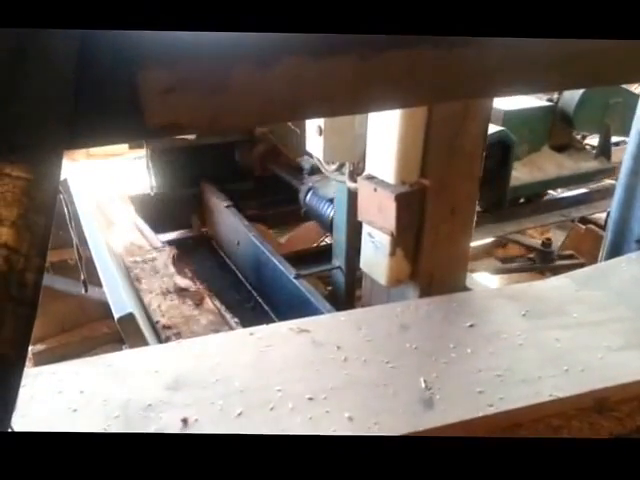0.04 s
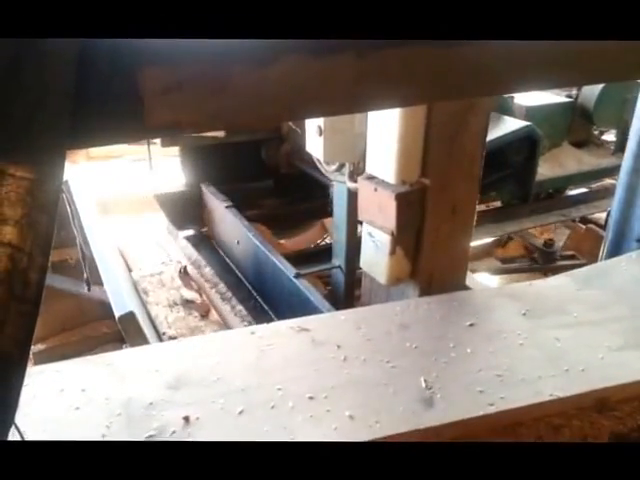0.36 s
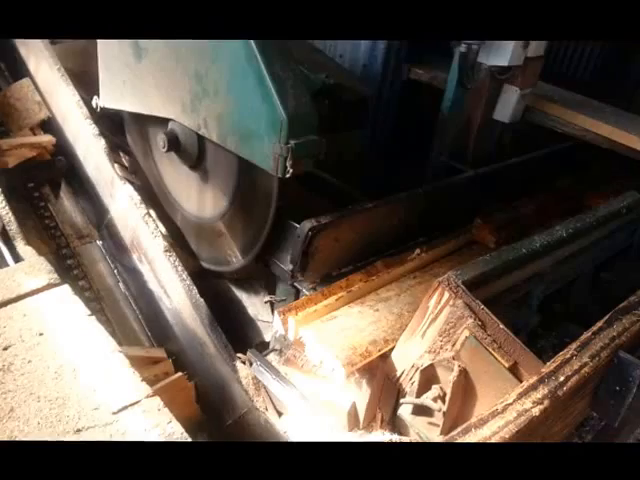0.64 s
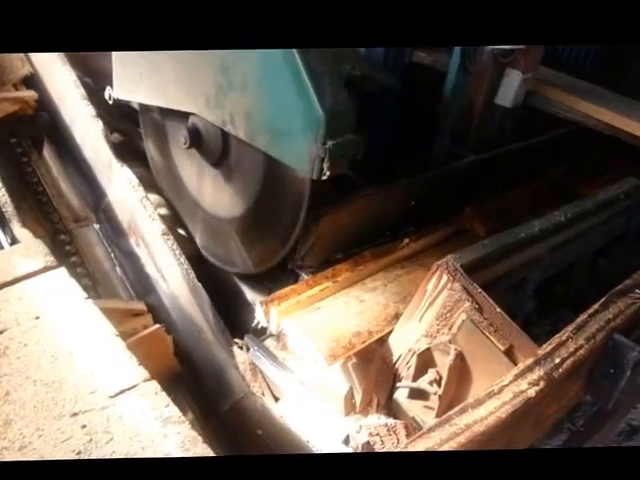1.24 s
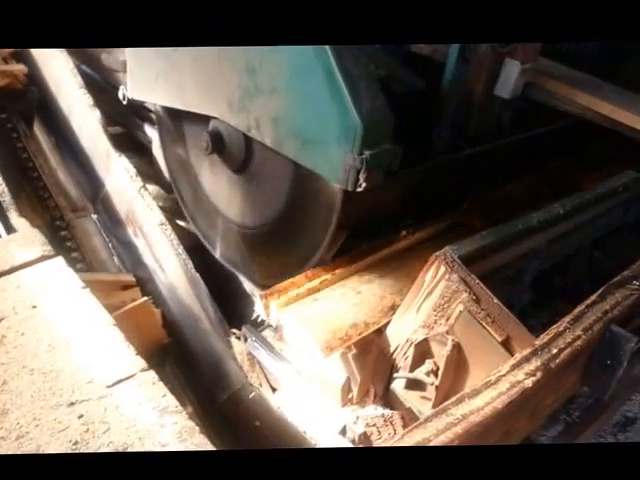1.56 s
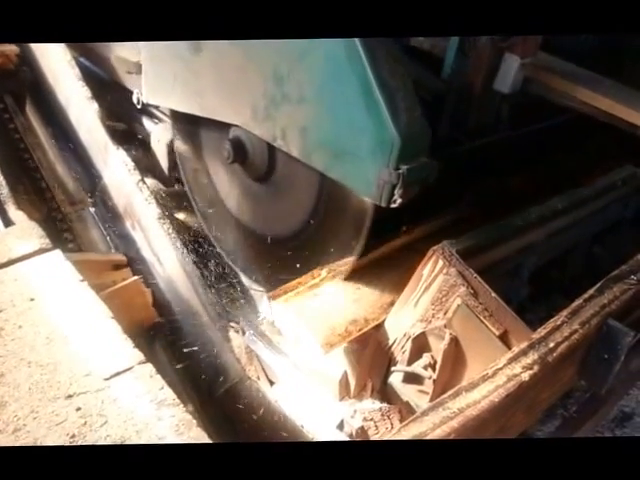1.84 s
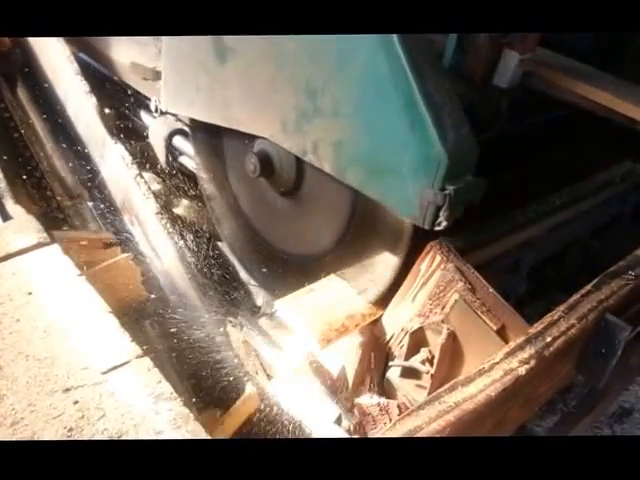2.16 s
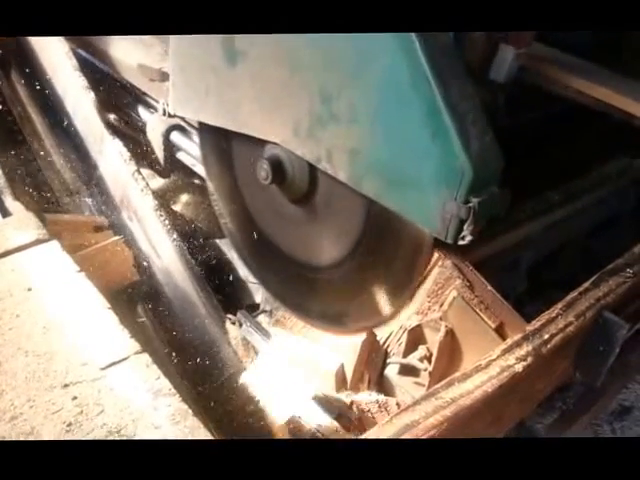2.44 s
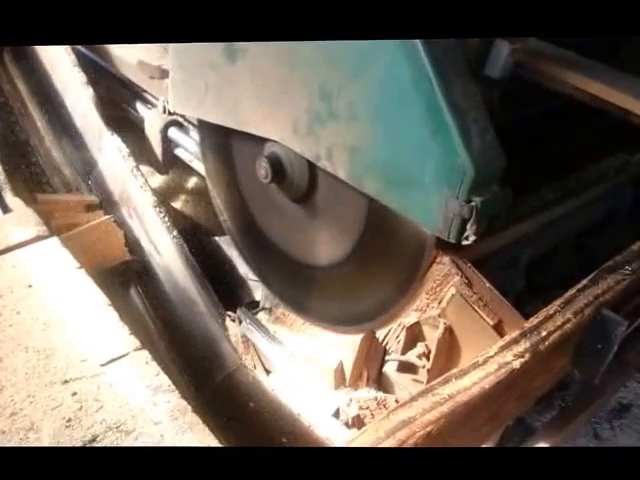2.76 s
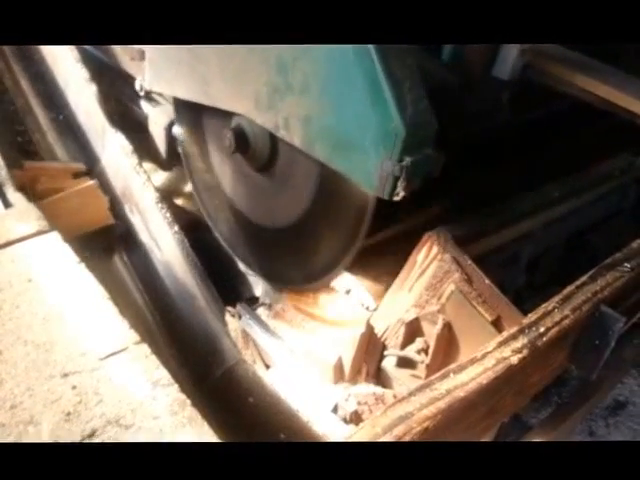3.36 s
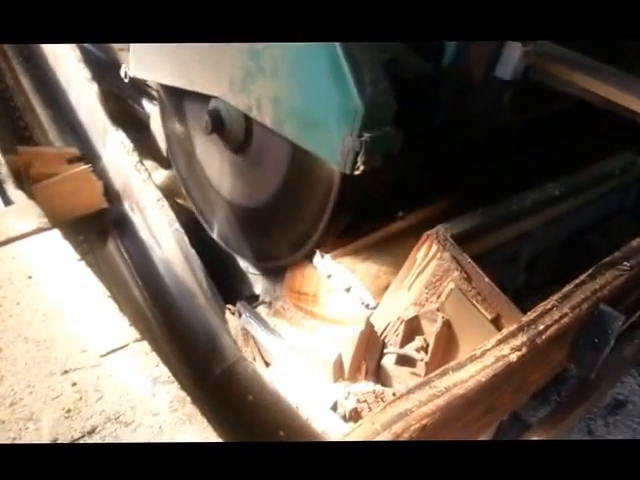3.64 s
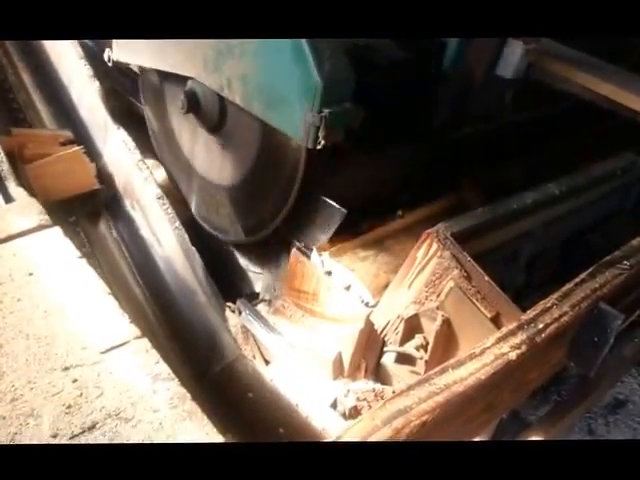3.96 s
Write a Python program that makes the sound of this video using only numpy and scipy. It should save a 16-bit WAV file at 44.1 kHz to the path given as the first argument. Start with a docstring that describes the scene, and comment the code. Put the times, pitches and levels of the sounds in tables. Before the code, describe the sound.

Close up, a large circular saw makes a light rasping cut with one wooden thud, spins freely, then bites hard, screeching and spraying chips. Wood knocks down and the whirring continues over the sawmill's low machine hum.

```python
"""A big circular saw spins in a humming sawmill: air shed by its teeth whirs in a narrow, fluttering band.
It starts with a light cut, the teeth buzzing and rasping, and the timber thuds once. As this cut ends
the sound drops out twice, then a thin whistle comes in. Near 2 s a hard cut slows the blade a little
and makes it ring, while gain control turns everything down, the mill included.
The offcut knocks down, and the blade whirs on."""
import sys
import numpy as np
from scipy import signal
from scipy.fft import rfft, irfft, next_fast_len
from scipy.io import wavfile
from scipy.ndimage import uniform_filter1d, map_coordinates

SR = 44100
rng = np.random.default_rng(int(sys.argv[2]) if len(sys.argv) > 2 else 0)


def wav_out(sig):
    """Save sig, one row per channel (or a flat mono array), as 16-bit PCM at SR to the path in sys.argv[1]."""
    wavfile.write(sys.argv[1], SR, np.round(np.clip(np.atleast_2d(sig).T, -1, 1) * 32767).astype(np.int16))


N = 176400
T = np.arange(N) / SR

# loudness of the spinning blade: time_s, whirr_db, air_db
SPIN_LEVELS = [(0, -15.5, -12), (.2, -11.5, -14.5), (.45, -21.5, -21.5), (.62, -12, -18), (.78, -10, -13),
               (.985, -9.5, -16), (1.02, -12, -17), (1.25, -12, -13), (1.76, -9.5, -13.5),
               (1.87, -14.5, -19.5), (2.5, -13.5, -18.5), (2.8, -12, -16.5), (2.97, -11.5, -13),
               (3.045, 0.5, -8.5), (3.08, -8.5, -14.5), (3.38, -9.5, -14.5), (3.45, -13, -10.5),
               (3.53, -6, -13), (4, -9.5, -13.5)]
# peaks of the whirr: pitch_hz, width_hz, level_db
WHIRR_PEAKS = [(910.2, 47, -1), (837, 36, -16), (985, 65, -19.5)]
# tone colour of the rushing air: pitch_hz, level_db
AIR_COLOUR = [(700, -19), (1150, -7.5), (1500, 0), (1900, -4), (2400, -10), (3100, -16.5), (4200, -20.5),
              (5600, -29.5), (8000, -28.5), (11000, -37), (14000, -62)]
# tone colour of the mill's rumble: pitch_hz, level_db
RUMBLE_COLOUR = [(25, -30), (90, -9), (130, -7), (240, 1), (390, 3), (490, -0.5), (720, 5), (1100, -4),
                 (2000, -20)]
# loudness of the rumble: time_s, level_db
RUMBLE_LEVELS = [(1.75, -27.5), (1.84, -40), (2.4, -34), (2.5, -29.5)]
# humming machines: pitch_hz, level_db, start_s, end_s
HUM_NOTES = [(228, -35, 2.5, 3.55), (224.2, -31.5, 3.5, 3.45), (247.6, -37, 0.9, 1.75),
             (398.4, -41.5, 0, 4), (597, -36.5, 2.5, 4), (644, -37.5, 1, 1.7), (746, -35, -0.5, 1.7),
             (372, -31.5, -0.5, 0.34)]
# wood against the teeth in the light cut: time_s, bite_db, chips_db
LIGHT_CUT = [(0, -23, -59), (.2, -21, -46), (.24, -21.5, -24.5), (.325, -20, -25), (.375, -16.5, -18),
             (.46, -18, -22), (.53, -20, -29.5), (.6, -19, -40), (.69, -22, -42), (.74, -37, -13),
             (.76, -70, -70)]
# the same for the hard cut: time_s, bite_db, chips_db
HARD_CUT = [(1.765, -37, -59), (1.785, -22.5, -19), (1.89, -14.5, -18), (1.95, 1.5, -10.5),
            (2.05, 1.5, -5.5), (2.2, 0.5, -8.5), (2.35, -5.5, -11.5), (2.47, -3, -14), (2.51, -9.5, -22.5),
            (2.57, -23.5, -31.5), (2.75, -28, -36), (3.3, -46, -45)]
# blade speed, sagging under load: time_s, teeth_per_s
BLADE_SPEED = [(.7, 632), (1.75, 628), (1.92, 627), (2.03, 613), (2.15, 616), (2.5, 618)]
# tones of the buzz: multiple_of_tooth_rate, light_cut_db, hard_cut_db
BUZZ_TONES = [(1, -32, -22), (2, -6, -8), (3, -9, -18), (4, -.5, -8), (5, 0, -13.5), (6, -5, -9.5),
              (7, -14, -15), (8, -9, -19.5), (9, -15, -34), (10, -14, -39), (11, -14, -39), (12, -11, -33),
              (13, -15, -35)]
# swell of the fourth buzz tone, used in the hard cut: time_s, gain_db
SCREECH_SWELL = [(.28, -5), (.36, 5), (.44, 4), (.52, -6), (1.9, -1), (1.99, -5), (2.04, 5), (2.21, 2),
                 (2.3, -16), (2.39, -3), (2.46, 6.5), (2.52, -8)]
# tone colour of rasping wood: pitch_hz, level_db
RASP_COLOUR = [(230, -46), (400, -17), (580, -4.5), (1100, -6.5), (1900, -1), (2450, 1), (3300, -4),
               (3780, 0), (4550, -7), (4950, -6), (5600, -12), (9000, -19)]
# tone colour of spraying chips: pitch_hz, level_db
CHIP_COLOUR = [(1500, -24), (4000, 0), (6000, -4.5), (8000, -1), (11000, -3), (14000, -11)]
# ringing steel of the blade: pitch_hz, level_db, ring_s (time to fade by 60 dB)
STEEL_NOTES = [(878, -17, .4), (1114, -28, .7), (1197, -22, 1.4), (1593, -22, .5), (1690, -20, .5),
               (1879, -25, 1), (2110, -25, 1), (2182, -24, 1.6), (2353, -22, .5), (2880, -19, .5),
               (3174, -20, .4), (3440, -26, .7), (3558, -22, .5), (3809, -19, .45), (3857, -20, .45),
               (4011, -26, .7), (4286, -19, .7)]
# brief singing tones in the cuts: pitch_hz, level_db, start_s, end_s
SINGING_NOTES = [(3970, -33, 0, .1), (4054, -27, .52, .64), (1252, -25, 1.76, 1.9), (4315, -25, 2.1, 2.45)]
# timber knocks: start_s, thud_db, clack_db, ring_s (time to fade by 60 dB)
TIMBER_KNOCKS = [(0.283, -19, -45, 0.42), (2.63, -26, -36, 0.29), (2.758, -25, -6.5, .055),
                 (2.783, -32, -15, .04), (2.802, -13, -3, 0.058), (2.815, -18, -8.5, 0.082)]
# tone colour of the dull thud: pitch_hz, level_db
THUD_COLOUR = [(60, -57), (200, -17), (380, 0.5), (560, 2.5), (900, -18), (2000, -40)]
# tone colour of the bright clack: pitch_hz, level_db
CLACK_COLOUR = [(400, -4), (1200, 2), (1900, -1), (2450, 7), (2900, -17), (12000, -33)]
# gaps where the sound drops out: start_s, end_s
GAPS = [(0.695, .7152), (0.727, .7578)]
# thin high whistle: time_s, pitch_hz, level_db
WHISTLE_PATH = [(.76, 6900, -35), (.88, 6660, -49), (1.02, 6750, -41), (1.25, 6880, -28.5),
                (1.45, 6930, -30.5), (1.49, 6900, -70)]

WHINE_HZ, WHINE_DB = 892.5, -5  # the blade's whine; level compared with the whirr's noise
GRIP_DB, THROUGH_S = -18.5, 2.53  # a lighter bite hardly buzzes; the teeth leave the wood
WOOD_HZ, WOOD_DB = 2190, -2.5  # the offcut's note; level compared with the clack's noise
LIMIT_DB, LIMIT_S = -6.5, 0.1  # gain control: highest average level, averaging time
LOW_CUT_HZ, TOP_HZ = 148, 14550


def amp(db):
    """Turn decibels into a gain."""
    return 10 ** (np.asarray(db) / 20)


def unit(x):
    """Scale x to an average power of 1."""
    return x / np.sqrt(np.mean(np.abs(x) ** 2) + 1e-20)


def colour(points):
    """Turn a tone colour table into a gain for any pitch, fading beyond its ends."""
    f, db = np.transpose(points)
    f, db = np.r_[f[0] / 2, f, f[-1] * 2], np.r_[db[0] - 30, db, db[-1] - 30]
    return lambda hz: amp(np.interp(np.log(hz + 1), np.log(f + 1), db))


def rippled(response, depth_db=3.3):
    """Add many fine peaks to a tone colour, like those of a big steel plate."""
    knots = rng.standard_normal(1500)
    return lambda hz: response(hz) * amp(depth_db * map_coordinates(knots, [hz / 38], mode="wrap"))


def curves(rows, outside=None):
    """Draw a line through time for each column after the first."""
    times, *columns = np.transpose(rows)
    return [np.interp(T, times, column, outside, outside) for column in columns]


def wobble(rate):
    """A smooth curve through `rate` random values a second."""
    return map_coordinates(rng.standard_normal(4000), [T * rate + 2], mode="wrap")


def filtered(x, response):
    """Give each pitch in x the gain that `response` sets."""
    size = next_fast_len(N + 8192)
    return irfft(rfft(x, size) * response(np.fft.rfftfreq(size, 1 / SR)), size)[..., :N]


def pan(left_db):
    """Two gains that make the left side left_db louder than the right."""
    return amp(np.array([[left_db], [-left_db]]) / 2)


def noise(response, alike, left_db, lead_s=0):
    """Coloured stereo noise; `alike` runs from 0 (unrelated sides) to 1 (matching sides)."""
    turn = np.arccos(np.clip(alike, -1, 1)) / 2
    mid, side = rng.standard_normal((2, N)) * [[np.cos(turn)], [np.sin(turn)]]
    shift = lambda hz: np.exp(1j * np.pi * hz * lead_s * np.array([[1], [-1]]))  # left comes earlier
    hiss = np.array([mid + side, mid - side])
    return unit(pan(left_db) * filtered(hiss, lambda hz: response(hz) * shift(hz)))


def tone(hz, rough, flutter, apart):
    """A wavering note: `rough` is how much, `flutter` how fast, `apart` how unlike the sides are."""
    knots = T[::64]
    draw = lambda: map_coordinates(rng.standard_normal(2000), [knots * flutter + 2], mode="wrap")
    shared = 1 + rough * (draw() + 1j * draw())
    own = apart * (draw() + 1j * draw())
    spin = np.exp(2j * np.pi * (np.cumsum(hz + 0 * T) / SR + rng.random()))
    return unit(np.array([(np.interp(T, knots, shared + side * own) * spin).real for side in (1, -1)]))


def held(rows, **waver):
    """Notes that fade in, hold from start to end, and fade out."""
    fade = lambda start, end: np.clip(np.minimum(T - start, end - T) / 0.096 + 1, 0, 1)
    return sum(amp(db) * fade(start, end) * tone(hz, **waver) for hz, db, start, end in rows)


def lagged(x, seconds):
    """Follow x slowly, so that it builds up and dies away."""
    keep = np.exp(-1 / (SR * seconds))
    return signal.lfilter([1 - keep], [1, -keep], x)


def spinning_blade():
    """Air shed by the teeth whirs and rushes, and the vibrating blade whines."""
    whirr_db, air_db = curves(SPIN_LEVELS)
    peaks = lambda f: np.sqrt(sum(amp(db) ** 2 / (1 + ((f - hz) / (0.71 * width)) ** 2) ** 1.736
                                  for hz, width, db in WHIRR_PEAKS))
    whine = amp(WHINE_DB) * tone(WHINE_HZ, rough=0.63, flutter=20, apart=0.24)
    whirr = amp(whirr_db) * unit(whine + noise(peaks, alike=0.79, left_db=0.3))
    air_level = amp(air_db + 1.4 * wobble(29.6))
    return whirr + air_level * noise(colour(AIR_COLOUR), alike=0.23, left_db=5.5, lead_s=-0.000053)


def mill():
    """The machines all around rumble and hum."""
    level = amp(curves(RUMBLE_LEVELS)[0] + 1.8 * wobble(12))
    rumble = level * noise(colour(RUMBLE_COLOUR), alike=0.84, left_db=-0.5)
    return rumble + held(HUM_NOTES, rough=0.47, flutter=9, apart=0.05)


def tooth_buzz(tooth_hz, light, hard, light_chips, hard_chips):
    """Teeth hit the wood so fast that they make a buzzing note with a fizzy top."""
    grip = light / (1 + (amp(GRIP_DB) / light) ** 4)
    press = hard ** 0.76 * np.clip((THROUGH_S - T) / 0.052, 0, 1)  # grows more slowly than the bite
    screech = amp(curves(SCREECH_SWELL)[0])
    buzz = 0
    for k, light_db, hard_db in BUZZ_TONES:
        level = amp(light_db) * (grip if k < 9 else light_chips)
        level += amp(hard_db) * press * (screech if k == 4 else 1)
        buzz += level * tone(k * tooth_hz, .36 * np.sqrt((k + 7) / 8), flutter=12 * (k + 3), apart=0.41)
    fizz = sum(tone(k * tooth_hz, rough=0.67, flutter=90, apart=1.0) for k in range(12, 21))
    return buzz + amp(-20.5) * (light_chips + np.minimum(hard_chips, amp(-12))) * fizz


def rasp_and_chips(tooth_hz, light, hard, spray):
    """Wood rasps and chips spray, pulsing each time a tooth strikes."""
    pulses = unit(1 + 0.3 * np.cos(2 * np.pi * np.cumsum(tooth_hz) / SR)) * amp(0.34 * wobble(60))
    bite = amp(1) * light + hard
    rasp = amp(-0.5) * bite * noise(rippled(colour(RASP_COLOUR)), alike=0.28, left_db=2.5)
    chips = amp(0.5) * spray * noise(rippled(colour(CHIP_COLOUR)), alike=0, left_db=3.0)
    return pulses * (rasp + chips)


def blade_ring(light, hard):
    """Cutting shakes the steel, and each of its notes rings on afterwards."""
    push = hard ** 2 + (0.24 * light) ** 2
    ring = 0
    for hz, db, ring_s in STEEL_NOTES:
        energy = lagged(push, ring_s / np.log(1e6))
        ring += amp(db) * np.sqrt(energy) * tone(hz, rough=0.38, flutter=20, apart=0.56)
    return amp(2) * ring


def cuts():
    """The saw bites into timber, lightly and then hard: it buzzes, rasps, rings and sings."""
    light, light_chips = amp(curves(LIGHT_CUT, outside=-120))
    hard, hard_chips = amp(curves(HARD_CUT, outside=-120))
    tooth_hz, = curves(BLADE_SPEED)
    buzz = tooth_buzz(tooth_hz, light, hard, light_chips, hard_chips)
    rasp = rasp_and_chips(tooth_hz, light, hard, light_chips + hard_chips)
    sing = held(SINGING_NOTES, rough=0.39, flutter=30, apart=0.33)
    return (buzz + blade_ring(light, hard) + sing) * pan(left_db=2.0) + rasp


def knocks():
    """Timber drops and bounces: each knock is a dull thud and a bright, briefly ringing clack."""
    thud_level, clack_level = np.zeros((2, N))
    for start_s, thud_db, clack_db, ring_s in TIMBER_KNOCKS:
        age = np.maximum(T - start_s, 0)
        fade = amp(-60 * age / ring_s) * (T > start_s)
        thud_level += amp(thud_db) * fade
        clack_level += amp(clack_db) * fade
    wood = amp(WOOD_DB) * np.sin(2 * np.pi * WOOD_HZ * T)
    thud = noise(colour(THUD_COLOUR), alike=0.99, left_db=1.5)
    clack = unit(wood + noise(colour(CLACK_COLOUR), alike=0.81, left_db=5.0))
    return thud_level * thud + clack_level * clack


def whistle():
    """The free-running blade whistles thinly between the cuts."""
    hz = curves(WHISTLE_PATH)[0]
    level = amp(curves(WHISTLE_PATH, outside=-120)[1] + 3 * wobble(40))
    return level * sum(amp(db) * tone(multiple * hz, rough=.3, flutter=90, apart=.3)
                       for multiple, db in [(1, -1), (1.5, -22), (2, -21)])


def scene():
    """Add all the sounds together."""
    return spinning_blade() + mill() + cuts() + knocks() + whistle()


def record(dry):
    """Gain control turns loud moments down; the sound drops out twice; deep bass and top treble are cut."""
    power = uniform_filter1d(np.mean(dry ** 2, axis=0), int(LIMIT_S * SR))
    level = np.sqrt(np.abs(power))
    x = dry * amp(-0.5) / (1 + (level / amp(LIMIT_DB)) ** 6) ** (1 / 6)
    x = x / (1 + np.abs(x) ** 8) ** (1 / 8)  # round off the tallest peaks
    in_gap = sum(((T > start) & (T < end)) * 1. for start, end in GAPS)
    x = x * (1 - uniform_filter1d(in_gap, size=40) * (1 - amp(-57.0)))
    bass_cut = lambda hz: np.maximum(.22, 1 / (1 + (LOW_CUT_HZ / (hz + 1)) ** 6))
    return filtered(x, lambda hz: (hz < TOP_HZ) * bass_cut(hz))


dry = scene()
out = record(dry)
wav_out(out)
```